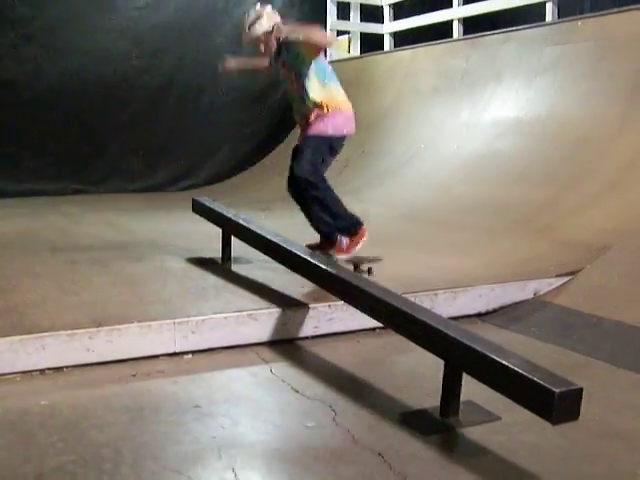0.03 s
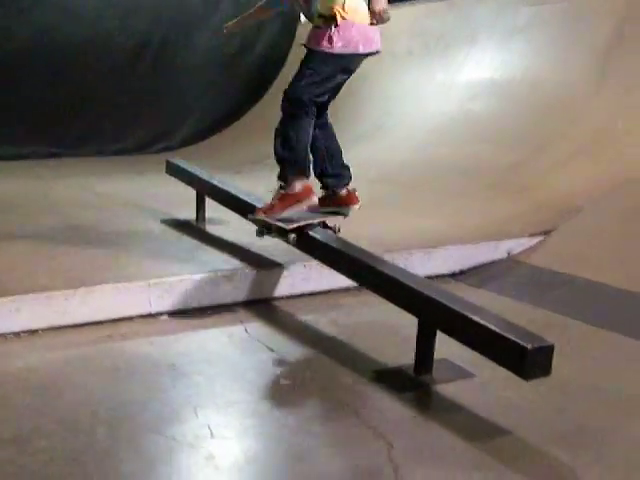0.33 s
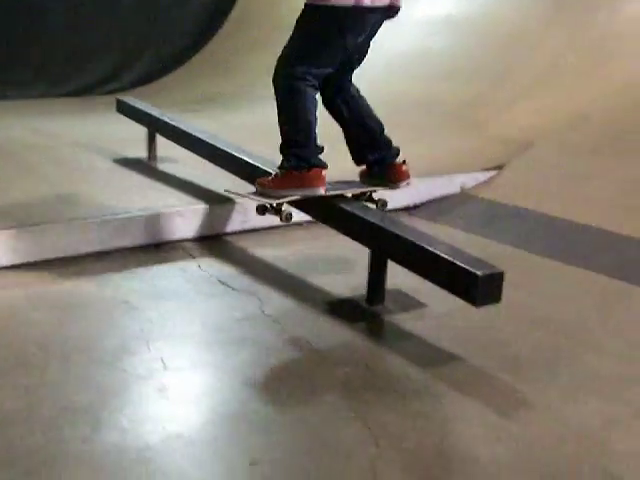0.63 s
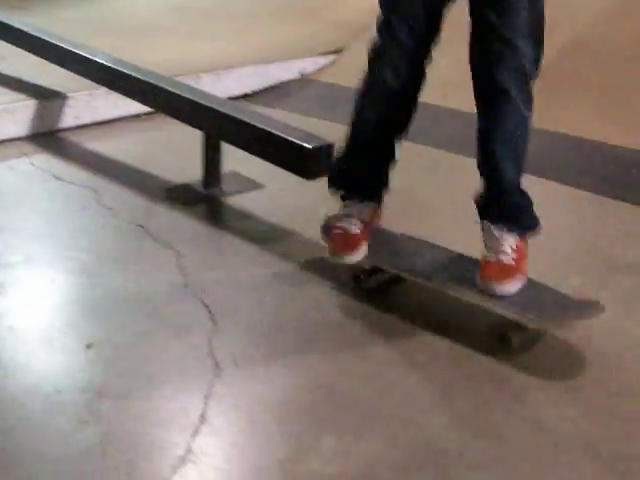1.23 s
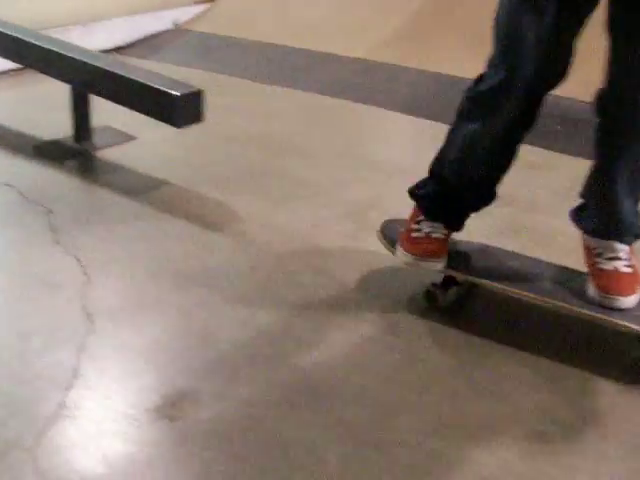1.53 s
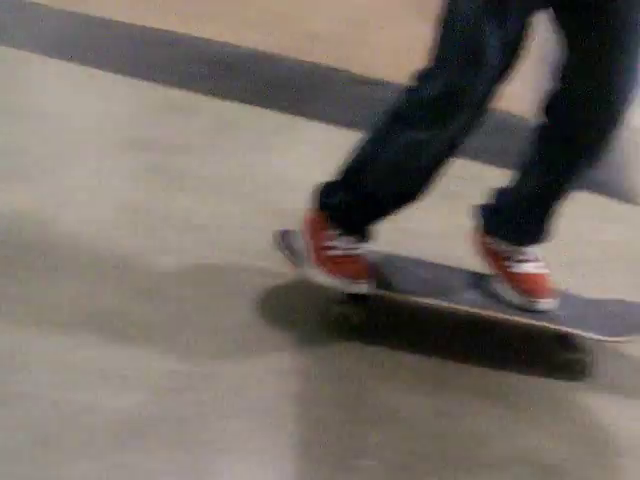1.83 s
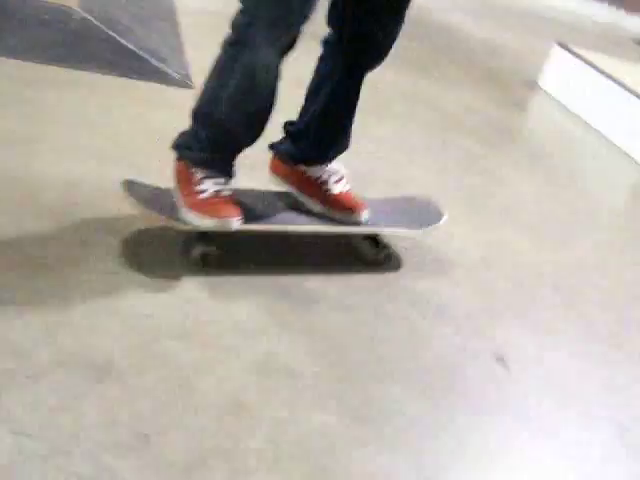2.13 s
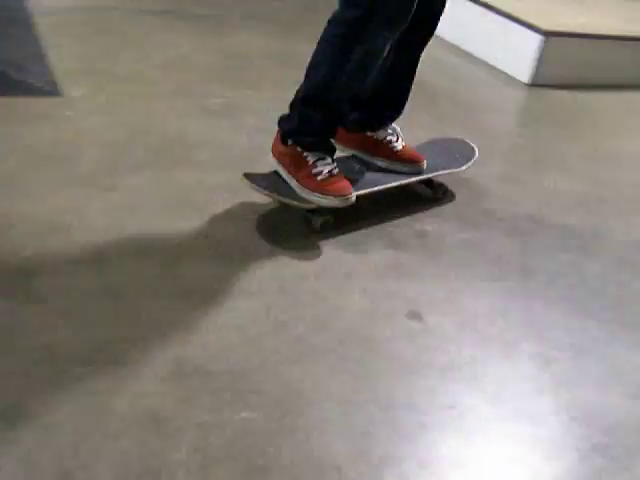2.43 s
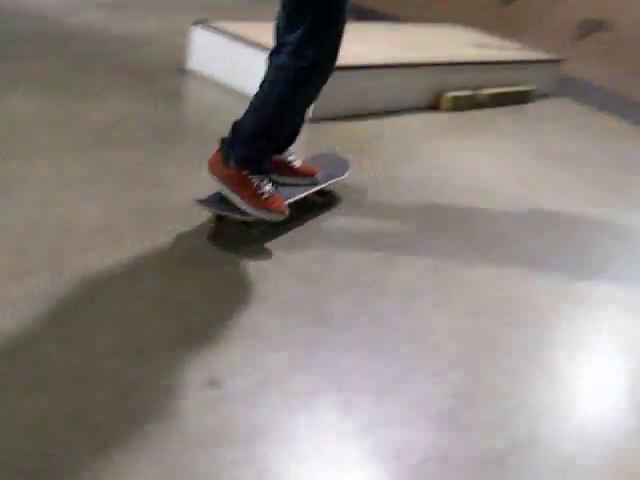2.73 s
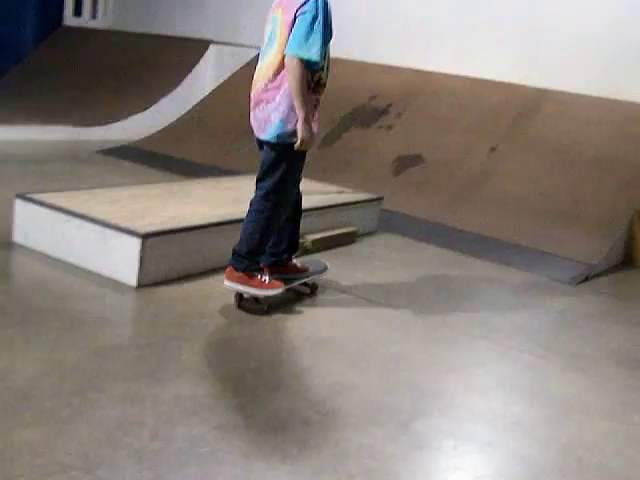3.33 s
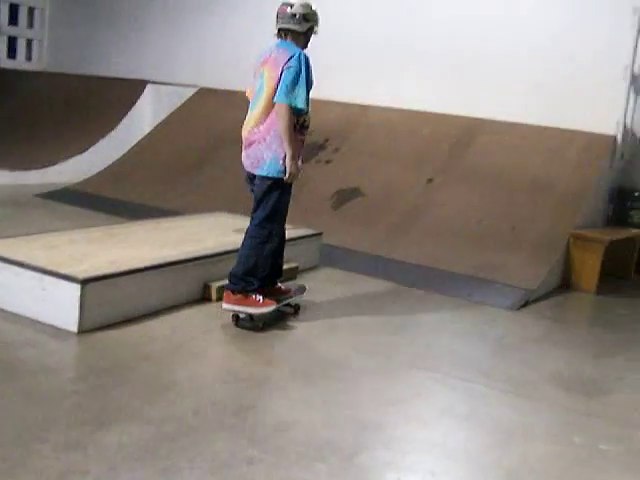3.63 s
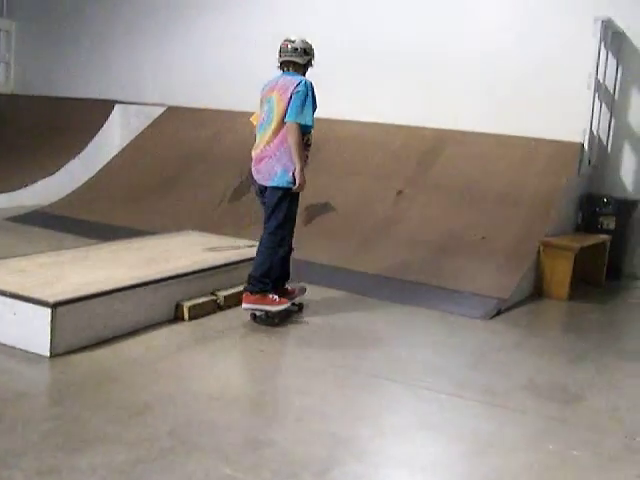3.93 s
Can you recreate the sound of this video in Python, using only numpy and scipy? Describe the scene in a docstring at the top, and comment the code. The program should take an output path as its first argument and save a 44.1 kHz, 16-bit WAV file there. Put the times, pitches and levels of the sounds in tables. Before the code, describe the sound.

A skateboard slides along a steel rail, slams onto concrete and rolls away indoors.

```python
"""A skateboard in an indoor park: the tail pops, the deck lands on a steel rail and slides along it,
and the wheels slam onto concrete, scuff through a turn and roll off over small cracks.
Impacts excite the damped modes of deck and rail; friction and surface roughness drive resonances
with noise. Behind them lie a ramp's boom, mains hum, a deep rumble and the hall's reverberation.
On the loud blows an automatic gain control ducks and the microphone's input clips."""
import sys
import numpy as np
from scipy import signal
from scipy.fft import rfft, irfft, next_fast_len
from scipy.io import wavfile
from scipy.ndimage import uniform_filter1d, map_coordinates

SR = 44100
rng = np.random.default_rng(int(sys.argv[2]) if len(sys.argv) > 2 else 0)


def materialize(psi):
    """Save the field psi as 16-bit PCM at rate SR to the path in sys.argv[1].

    A 1-D psi becomes a single channel; in a 2-D psi each row is a channel.
    """
    bounded = np.clip(np.atleast_2d(psi).T, -1, 1)
    quanta = np.round(bounded * 32767).astype(np.int16)
    wavfile.write(sys.argv[1], SR, quanta)


N = 176400

# Levels are relative; t60 is the time of a 60 dB decay.
# blows on the board: t/s, crack level/dB, deck ring level/dB, thud level/dB, crack t60/s
BOARD_BLOWS = [(.087, -0.5, -31.5, -36.5, 0.051), (0.262, -10, -43, -49.5, 0.047),
               (0.28, -2, -29.5, -40.5, .055), (0.291, 3, -24.5, -24, 0.041),
               (0.312, -4.5, -11.5, -37, 0.093), (1.1201, -1, -7.5, -20.5, 0.11),
               (1.1829, 3, -5, -16, 0.27), (1.201, 2.5, -6, -6.5, 0.064), (1.224, -18, -13, -10, 0.15),
               (1.252, -9, -15.5, -16, .18)]
# modes of the wooden deck and trucks: f/Hz, level/dB, t60/s
DECK_MODES = [(159.3, -6, 0.4), (301.6, 10, 0.037), (508, -3, 0.064), (656, -3.5, 0.12), (772, 0.5, 0.041),
              (1579, 7, 0.039), (1770, -2, 0.057), (2497, 8, 0.031), (4770, 3, .04)]
# spectra of a blow's crack and thud: f/Hz, level/dB
CRACK_SPECTRUM = [(120, -27.5), (300, -13), (900, -12), (1600, -3.5), (2700, -3.5), (4000, -5),
                  (5700, -7.5), (8000, -12)]
THUD_SPECTRUM = [(100, -8), (170, 5.5), (330, 5.5), (560, 1), (1500, -0.5), (2500, -25.5)]

# modes of the steel rail: f/Hz, level/dB, t60/s
RAIL_MODES = [(1715.4, -3.5, 0.064), (1844, -3, .2), (2250, -9, .1), (3120, 1, 0.1), (3316, -4, 0.077),
              (4200, -14.5, 0.12), (4700, -9, 0.062), (4820, -2.5, 0.068), (5540, 3, .05)]
# strikes of the deck on the rail: t/s, level/dB
RAIL_STRIKES = [(0.2903, 3), (0.312, -7.5)]
# envelopes of the sliding friction and of the rail's singing: t/s, level/dB
SLIDE_ENVELOPE = [(.275, -22.5), (.315, 1), (.39, -1.5), (.47, -12), (.57, -17), (.72, -20), (.86, -17.5),
                  (.94, -19), (.98, -28.5), (1.05, -76.5)]
SING_ENVELOPE = [(.31, -31), (.43, -18.5), (.5, -33), (.58, -49), (.63, -26), (.7, -39.5), (.83, -36),
                 (.92, -55)]
# spectrum of the sliding friction: f/Hz, level/dB
SLIDE_SPECTRUM = [(250, -31), (500, -23.5), (950, -9), (1600, -8.5), (2300, -4.5), (3300, -1), (4300, 2),
                  (4900, 6.5), (5400, -4), (5900, 0), (8000, -17)]
# singing modes of the rail: f/Hz, level/dB
SING_PARTIALS = [(1121, 1), (1704, -6)]

# wheels rolling on concrete: t/s, rumble level/dB, whirr level/dB, hiss level/dB
ROLL_ENVELOPES = [(0, -33, -39, -28.5), (.09, -28, -27, -27), (.25, -48.5, -25.5, -37.5),
                  (.6, -41.5, -34, -33), (1.15, -36.5, -35.5, -36), (1.3, -26, -18, -11.5),
                  (1.8, -27, -32, -25), (2.22, -30, -33.5, -27), (2.42, -27, -39, -27.5),
                  (2.62, -28, -38, -28.5), (2.9, -25.5, -35, -27), (3.1, -31, -30, -29.5),
                  (3.28, -31, -31, -29), (3.8, -24, -35, -24.5), (4, -26, -31, -27.5)]
# spectra of the rolling rumble and hiss: f/Hz, level/dB
ROLL_SPECTRUM = [(90, -5.5), (160, -1.5), (300, -2), (440, -9.5), (620, -5), (800, -5), (1100, -10),
                 (2000, -22.5)]
HISS_SPECTRUM = [(500, -37.5), (1150, -8.5), (1550, -7.5), (2200, -1.5), (2900, 0.5), (4000, 1.5),
                 (4900, 2), (5800, -2), (8000, -10.5)]
# wheels slipping sideways: t/s, squeal level/dB, chatter level/dB
SCUFF_ENVELOPES = [(1.88, -41, -53), (1.925, -22.5, -37.5), (1.942, -14.5, -25), (1.98, -24.5, -23),
                   (2.015, -34.5, -14), (2.04, -28, -17.5), (2.075, -30, -50), (2.14, -19.5, -37.5),
                   (2.18, -61, -59)]
# rasp of the wheels leaning into the curve: t/s, level/dB
RASP_ENVELOPE = [(2.2, -46.5), (2.37, -26.5), (2.6, -35.5), (2.79, -29), (2.95, -28.5), (3.15, -44.5)]
# wheel resonances in rolling, slipping and leaning: f/Hz, level/dB, t60/s
WHIRR_MODES = [(800, -10.5, 0.035), (1500, -2, 0.0085), (1680, -1.5, 0.007)]
SQUEAL_MODES = [(4850, -14.5, 0.0048), (5700, -10, 0.0045)]
CHATTER_MODES = [(1160, -5.5, 0.11), (1880, 3, 0.012), (2850, 7.5, 0.0034), (3850, -1.5, .008)]
RASP_MODES = [(2610, 4, 0.0042), (3930, 4, 0.011), (4700, 1, 0.0072), (5650, -0.5, 0.016)]
# wheels crossing cracks: t/s, level/dB, treble tilt/(dB per octave)
WHEEL_CLACKS = [(2.0507, -4, -2), (2.0603, -8, -5.5), (3.1686, -13.5, -0.5), (3.2473, -7.5, 6),
                (3.407, -15.5, 6), (3.4197, -4.5, 1), (3.4357, -10, -1), (3.6832, 0, 7)]
# modes of wheel and axle: f/Hz, level/dB, t60/s
TRUCK_MODES = [(280, -11, 0.016), (1550, -6, 0.0035), (1900, 0.5, 0.0027), (3350, 4, 0.0033),
               (4770, -10.5, 0.0016)]
# short scrapes, of the deck slipping off the rail (0.934 s) and otherwise of the wheels on grit:
# t/s, level/dB, centre f/Hz, width/octaves, t60/s
SCRAPES = [(0.128, -10.5, 5880, 0.13, 0.018), (0.934, -30.5, 797, 0.23, 0.45),
           (1.75, -14.5, 5300, 0.14, 0.047), (1.795, -21.5, 4620, 0.057, 0.33), (2.668, -18, 5200, .1, .07),
           (2.7512, -10.5, 4270, 0.32, 0.01), (3.671, -9, 600, 0.48, 0.025), (3.684, -17, 490, 0.77, 0.11),
           (3.699, -15.5, 2500, 1, 0.14)]

# partials of the mains hum: f/Hz, level/dB
HUM_PARTIALS = [(119.9, -26.5), (240.4, -38.5)]
# envelope of the room rumble: t/s, level/dB
RUMBLE_ENVELOPE = [(0, -26), (.25, -24), (.38, -18), (.6, -25.5), (1.2, -28.5), (2, -37.5), (3.2, -42.5),
                   (3.45, -30.5), (4, -41)]
# spectrum of the room rumble: f/Hz, level/dB
RUMBLE_SPECTRUM = [(12, -13), (25, -9.5), (38, -11), (58, -1), (78, -15), (110, -14), (250, -23),
                   (800, -34)]
# reverberation time of the hall: f/Hz, t60/s
HALL_T60 = [(150, 0.69), (400, 0.41), (1000, 0.76), (2700, 1.43), (6000, 0.9), (9000, 0.32)]
# likeness of left and right: f/Hz, coherence/1
COHERENCE = [(100, 0.96), (1000, 0.95), (2000, 0.64), (5000, 0.44)]
# microphone response: f/Hz, level/dB
MIC_RESPONSE = [(20, 1.5), (5000, 1), (5900, 3.5), (6500, -1), (7300, -4.5), (8200, -21), (9000, -44),
                (11000, -100.5)]

THUD_T60_S, CLACK_T60_S, CLACK_TILT_ABOVE_HZ = 0.26, 0.027, 1600
RAIL_RUB_DB, RAIL_HIT_DB, SLIDE_JUDDER_DB = -12, -9.5, 1.6
SING_JITTER_HZ, SING_FLUTTER_DB = 7, 1.5
SWAY_HZ, SWAY_DB, SWAY_RISE_S, SWAY_T60_S = 64.4, -21, 0.038, 2.9
RASP_DRIFT, RASP_ROUGH_DB = .015, 2.5
GRIT_PER_S, GRIT_SPREAD_DB = 2500, 2.5
PATCH_DB, PATCH_HZ, PATCH_S = 1.3, 232, 0.076  # depth, width and life of shifting resonances in a hiss
RAMP_HZ, RAMP_T60_S, RAMP_DB = 136, 0.68, -16.5
HUM_WAVER_DB = .7
HALL_DB, HALL_BUILD_S, SLIDE_WET_DB, CONTACT_WET_DB = -3.5, 0.013, -4.5, -8
ROLL_PAN_DB, HALL_PAN_DB, LEFT_LEAD_S = 1.28, 0.74, .00005  # a pan is added left and subtracted right
DUCK_ABOVE_DB, DUCK_SHARE, DUCK_RELEASE_DB_PER_S, DUCK_ATTACK_S = -17, 0.32, 8, 0.029
CLIP_DB, LOWPASS_HZ = 3, 16500


def board_blows():
    """Impact excitation: a hard crack, free vibration of the deck, a dull thud of wheels and weight."""
    crack = stereo(noise(), spectrum(CRACK_SPECTRUM))
    thud = stereo(noise(), spectrum(THUD_SPECTRUM))
    return sum(amp(crack_db) * decay(start, t60) * crack
               + amp(ring_db - 4.5) * ring(DECK_MODES, start)
               + amp(thud_db) * decay(start, THUD_T60_S) * thud
               for start, crack_db, ring_db, thud_db, t60 in BOARD_BLOWS)


def rail_slide():
    """Impact and sliding friction: the deck strikes the rail's modes, then drives them with noise."""
    pressure, = envelopes(SLIDE_ENVELOPE, outside=-120)
    friction = stereo(patchy(noise()), spectrum(SLIDE_SPECTRUM))
    rubbed = amp(RAIL_RUB_DB) * stereo(grit(), resonators(RAIL_MODES))
    struck = sum(amp(RAIL_HIT_DB + db) * ring(RAIL_MODES, start) for start, db in RAIL_STRIKES)
    judder = amp(-1.5 + SLIDE_JUDDER_DB * wobble(45))
    return pressure * judder * (friction + rubbed) + struck


def rail_singing():
    """Friction-driven oscillation: the sliding deck sustains two slightly unsteady modes of the rail."""
    envelope, = envelopes(SING_ENVELOPE, outside=-120)
    tones = 0
    for hz, db in SING_PARTIALS:
        level = amp(db + SING_FLUTTER_DB * wobble(60))
        phase = 2 * np.pi * np.cumsum(hz + SING_JITTER_HZ * wobble(120)) / SR
        tones += level * np.sin(phase)
    return np.sqrt(2) * envelope * tones


def rail_sway():
    """Lightly damped bending: the whole rail flexes on its legs after the deck lands."""
    t, landing = clock(), RAIL_STRIKES[0][0]
    rise = 1 - np.exp(-np.maximum(t - landing, 0) / SWAY_RISE_S)
    return amp(SWAY_DB) * rise * decay(landing, SWAY_T60_S) * np.sin(2 * np.pi * SWAY_HZ * t)


def rolling():
    """Roughness excitation: hard wheels rumble, whirr and hiss on the grain of the concrete."""
    rumble, whirr, hiss = envelopes(ROLL_ENVELOPES)
    return (rumble * amp(wobble(16)) * stereo(noise(), spectrum(ROLL_SPECTRUM))
            + whirr * amp(wobble(10)) * stereo(noise(), resonators(WHIRR_MODES))
            + hiss * amp(1.1 * wobble(20)) * stereo(patchy(grit() + noise()), spectrum(HISS_SPECTRUM)))


def wheel_scuff():
    """Sliding friction: sideways slip drives a thin squeal and a lower chatter."""
    squeal, chatter = envelopes(SCUFF_ENVELOPES, outside=-120)
    flutter = amp(wobble(90))
    return flutter * (squeal * stereo(grit(), resonators(SQUEAL_MODES))
                      + chatter * stereo(grit() + noise(), resonators(CHATTER_MODES)))


def wheel_rasp():
    """Forced resonance: side load makes the wheels rasp at pitches that drift with the rider's weight."""
    envelope, = envelopes(RASP_ENVELOPE, outside=-120)
    position = np.cumsum(1 + RASP_DRIFT * wobble(14))  # an uneven reading speed bends the pitch
    steady = stereo(grit(), resonators(RASP_MODES))
    drifting = np.array([map_coordinates(side, [position], mode="wrap") for side in steady])
    return envelope * amp(RASP_ROUGH_DB * wobble(190)) * drifting


def truck_clacks():
    """Shock excitation: each crack sends a short noise burst through the modes of wheel and axle."""
    def truck(tilt_db):
        octaves_above = lambda f: np.log2(np.maximum(f / CLACK_TILT_ABOVE_HZ, 1))
        return lambda f: resonators(TRUCK_MODES)(f) * amp(tilt_db * octaves_above(f))
    return sum(amp(db) * decay(start, CLACK_T60_S) * stereo(noise(), truck(tilt_db))
               for start, db, tilt_db in WHEEL_CLACKS)


def scrapes():
    """Transient friction: the deck slipping off the rail, or wheels on grit, give fading noise bands."""
    def band(centre, octaves):
        return lambda f: (1 + (np.log2((f + 1) / centre) / octaves) ** 2 / 2) ** -2
    return sum(amp(db) * decay(start, t60) * stereo(noise(), band(hz, octaves))
               for start, db, hz, octaves, t60 in SCRAPES)


def ramp_boom():
    """Free vibration: one low mode of the wooden ramp dies away as the wheels leave it."""
    return amp(RAMP_DB) * decay(0, RAMP_T60_S) * np.sin(2 * np.pi * RAMP_HZ * clock())


def mains_hum():
    """Forced vibration: the mains sustain two partials that waver in level."""
    return sum(np.sqrt(2) * amp(db + HUM_WAVER_DB * wobble(4.6))
               * np.sin(2 * np.pi * (hz * clock() + rng.random())) for hz, db in HUM_PARTIALS)


def room_rumble():
    """Amplitude-modulated noise: a deep rumble swells and fades in the room."""
    envelope, = envelopes(RUMBLE_ENVELOPE)
    return envelope * stereo(noise(), spectrum(RUMBLE_SPECTRUM))


def hall(x):
    """Reverberation: a diffuse field builds up, then decays at each frequency's own rate."""
    hz, t, bins = signal.stft(rng.standard_normal((2, 2 * SR)), SR, nperseg=256)
    fade = np.exp(-np.log(1000) * t / log_interp(HALL_T60, hz)[:, None])
    build = 1 - np.exp(-t / HALL_BUILD_S)
    tail = signal.istft(bins * fade * build, SR, nperseg=256)[1]
    tail = tail / np.linalg.norm(tail[0])
    wet = signal.fftconvolve(x, tail, axes=1)[:, :N]
    bass = filtered(wet, lambda f: np.clip(log_interp(COHERENCE, f), 0, 1) ** 4)
    return amp(HALL_DB) * (wet - bass + bass[0])  # both sides share the left side's bass


def ring(modes, start, vary_db=2):
    """Modal superposition: damped sines struck at start, weighted differently at every blow."""
    t, out = np.arange(SR) / SR, np.zeros(N + SR)
    for hz, db, t60 in modes:
        gain = amp(db + vary_db * rng.normal()) * rng.choice([-1, 1])
        out[round(start * SR):][:SR] += gain * np.sin(2 * np.pi * hz * t) * np.exp(-np.log(1000) * t / t60)
    return out[:N]


def resonators(modes):
    """Response of parallel resonators: damping sets each bandwidth, level each mode's power."""
    widths = [np.log(1000) / np.pi / t60 for _, _, t60 in modes]
    return lambda f: sum(amp(db) / np.sqrt(width) * 1j * f * width / (hz * hz - f * f + 1j * f * width)
                         for (hz, db, _), width in zip(modes, widths))


def grit():
    """Shot noise: two streams of tiny contacts of uneven size over a fine hiss."""
    contacts = (rng.random((2, N)) < GRIT_PER_S / SR) * noise() * amp(GRIT_SPREAD_DB * noise())
    return unit_rms(unit_rms(contacts) + .5 * noise())


def patchy(pair):
    """Spectral modulation: narrow resonances swell and fade at random in a hiss."""
    hz, t, bins = signal.stft(pair, SR, nperseg=1024)
    grid = np.meshgrid(hz / PATCH_HZ, t / PATCH_S, indexing="ij")
    patches = map_coordinates(rng.standard_normal((200, 100)), grid, mode="wrap")
    return signal.istft(bins * amp(PATCH_DB * patches), SR, nperseg=1024)[1][:, :N]


def stereo(pair, response):
    """Partial coherence: two filtered noises mix as mid and side into left and right, rms 1."""
    def mid_side(hz):
        angle = np.arccos(np.clip(log_interp(COHERENCE, hz), -1, 1)) / 2
        return response(hz) * np.array([np.cos(angle), np.sin(angle)])
    mid, side = filtered(pair, mid_side)
    return unit_rms(np.array([mid + side, mid - side]))


def filtered(x, response):
    """Linear filtering: the spectrum of x times a frequency response."""
    size = next_fast_len(N + SR)
    return irfft(rfft(x, size) * response(np.fft.rfftfreq(size, 1 / SR)), size)[..., :N]


def spectrum(points):
    """Magnitude response of a table of f/Hz, level/dB."""
    return lambda hz: amp(log_interp(points, hz))


def log_interp(points, hz):
    """Interpolation of a table on a logarithmic frequency axis."""
    f, values = np.transpose(points)
    return np.interp(np.log(hz + 1), np.log(f + 1), values)


def envelopes(rows, outside=None):
    """Interpolation in time: a gain curve per level column, held at outside/dB beyond it if given."""
    times, *columns = np.transpose(rows)
    return [amp(np.interp(clock(), times, db, outside, outside)) for db in columns]


def decay(start, t60):
    """Exponential decay from a jump to 1 at start."""
    t = clock() - start
    return (t >= 0) * np.exp(-np.log(1000) * np.maximum(t, 0) / t60)


def wobble(rate):
    """Random modulation: a smooth curve with rate knots a second."""
    return map_coordinates(rng.standard_normal(400), [clock() * rate], mode="wrap")


def noise():
    """Two uncorrelated white noises."""
    return rng.standard_normal((2, N))


def amp(db):
    """Amplitude ratio of a level in decibels."""
    return 10 ** (np.asarray(db) / 20)


def unit_rms(x):
    """Normalisation to rms 1."""
    return x / np.sqrt(np.mean(x ** 2) + 1e-20)


def clock():
    """t/s at each sample."""
    return np.arange(N) / SR


def scene():
    """Superposition: the blows are central; level and time cues place the rest slightly to the left."""
    blows, slide = board_blows(), rail_slide()
    contacts = truck_clacks() + scrapes() + wheel_scuff() + wheel_rasp()
    wet = hall(blows + amp(SLIDE_WET_DB) * slide + amp(CONTACT_WET_DB) * contacts)
    sides = np.array([[1], [-1]])
    left_first = lambda x: filtered(x, lambda f: np.exp(1j * np.pi * f * LEFT_LEAD_S * sides))
    sustained = left_first(rolling()) + rail_singing() + rail_sway()
    background = ramp_boom() + mains_hum() + room_rumble()
    return (blows + (left_first(slide + contacts) + wet) * amp(HALL_PAN_DB * sides)
            + (sustained + background) * amp(ROLL_PAN_DB * sides))


def record(dry):
    """Compression and saturation: a dull microphone, a gain that ducks and recovers, hard clipping."""
    x = filtered(dry, spectrum(MIC_RESPONSE))
    power = uniform_filter1d(np.mean(x ** 2, axis=0), size=256)
    level_db = 10 * np.log10(np.abs(power) + 1e-12)
    excess_db = np.maximum(level_db - DUCK_ABOVE_DB, 0)
    recovery = DUCK_RELEASE_DB_PER_S * clock()
    duck_db = np.maximum.accumulate(DUCK_SHARE * excess_db + recovery) - recovery  # leaky peak hold
    pole = np.exp(-1 / (DUCK_ATTACK_S * SR))
    ducked = x * amp(-signal.lfilter([1 - pole], [1, -pole], duck_db))
    clipped = np.clip(ducked, -amp(CLIP_DB), amp(CLIP_DB))
    return filtered(clipped, lambda hz: 1 / (1 + (hz / LOWPASS_HZ) ** 40))


dry = scene()
out = record(dry)
materialize(out)
```